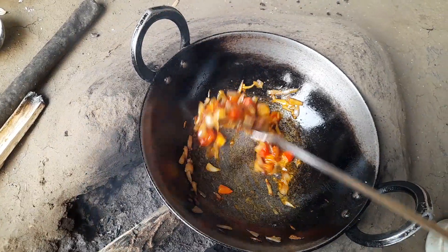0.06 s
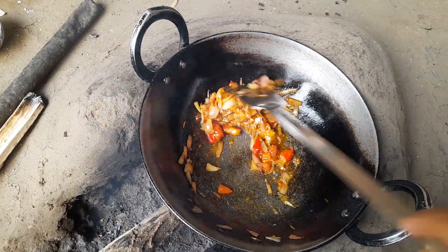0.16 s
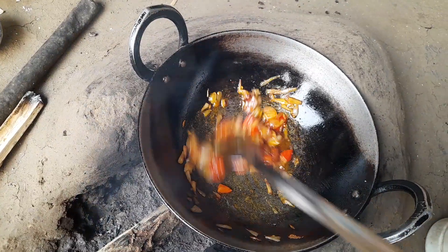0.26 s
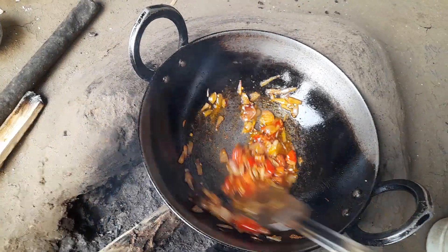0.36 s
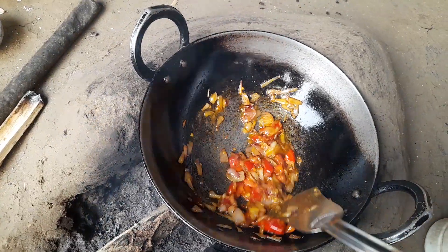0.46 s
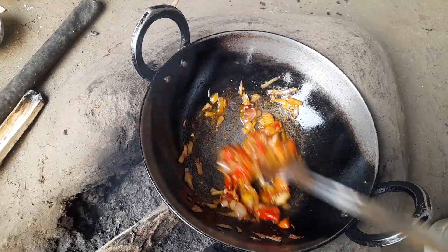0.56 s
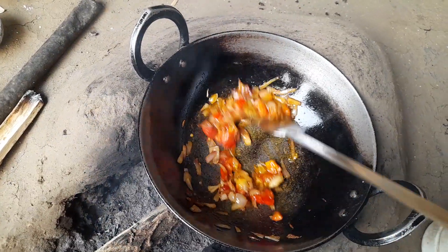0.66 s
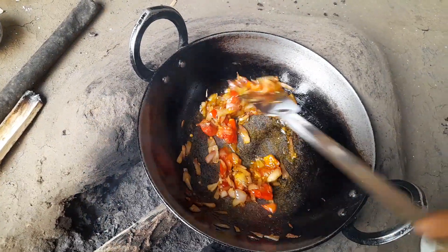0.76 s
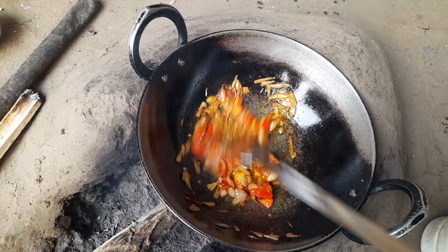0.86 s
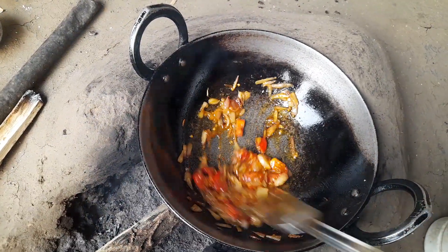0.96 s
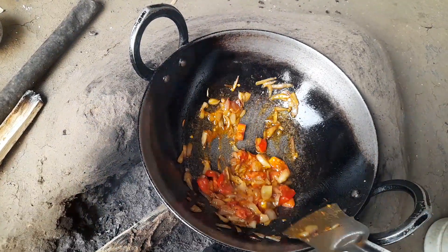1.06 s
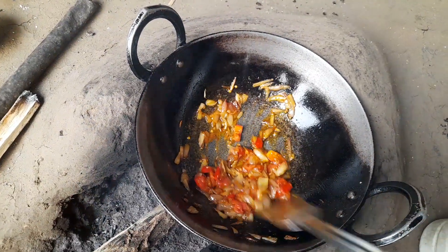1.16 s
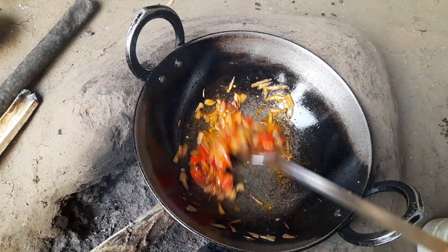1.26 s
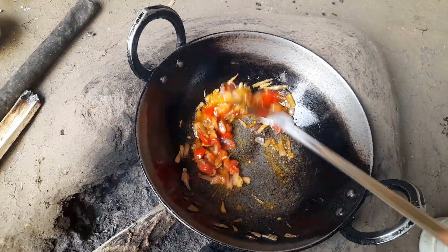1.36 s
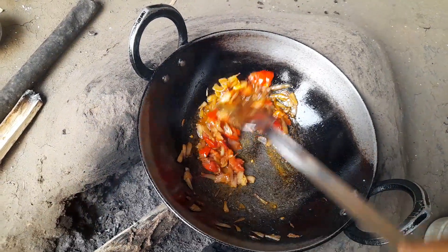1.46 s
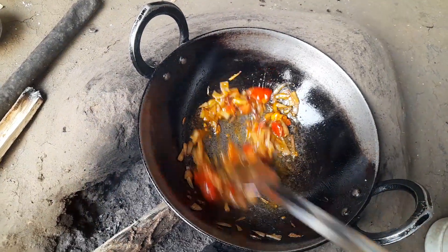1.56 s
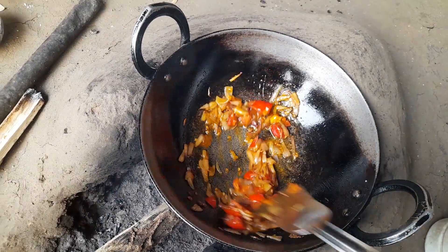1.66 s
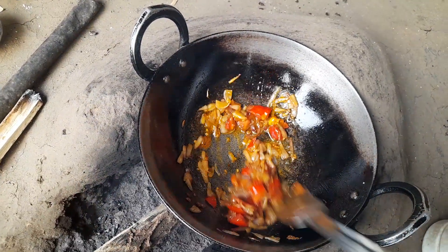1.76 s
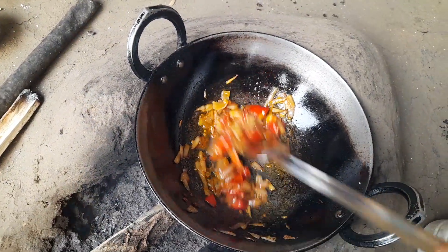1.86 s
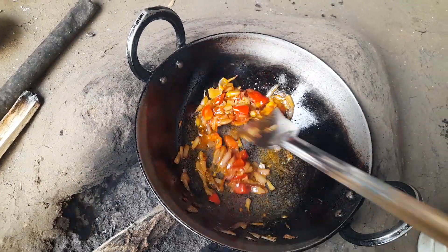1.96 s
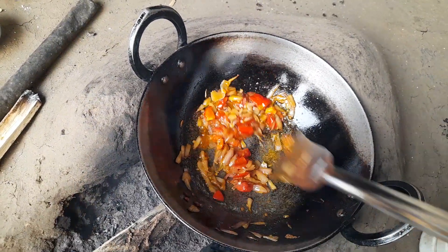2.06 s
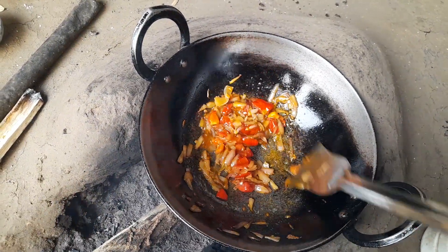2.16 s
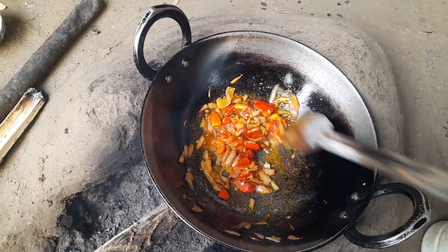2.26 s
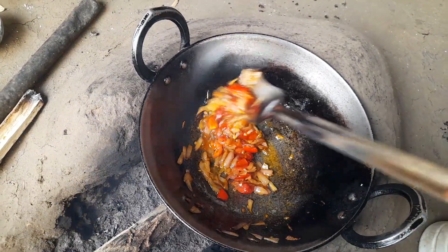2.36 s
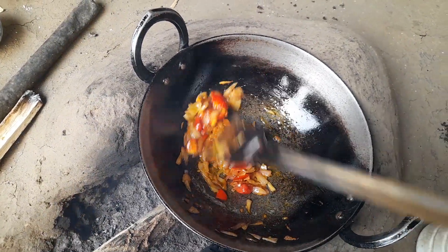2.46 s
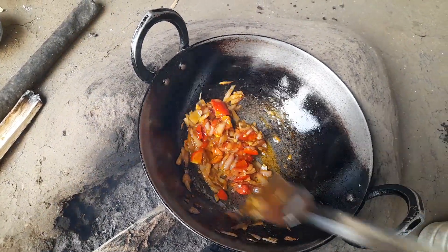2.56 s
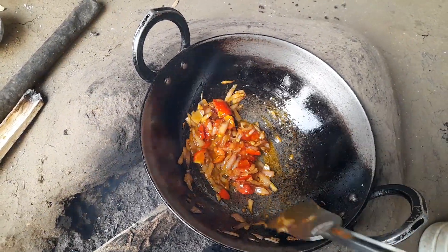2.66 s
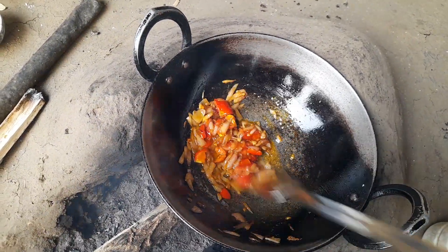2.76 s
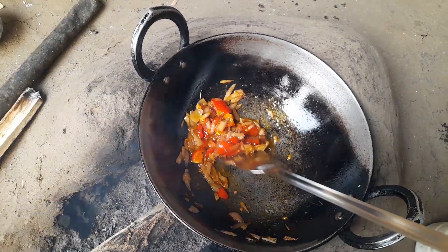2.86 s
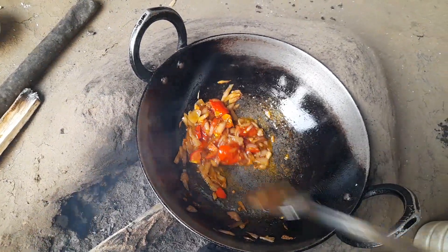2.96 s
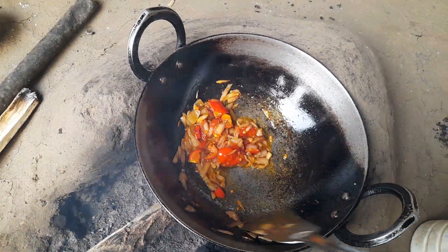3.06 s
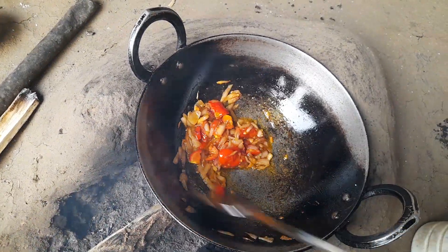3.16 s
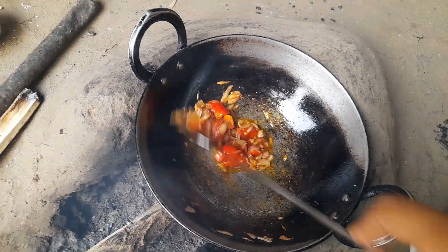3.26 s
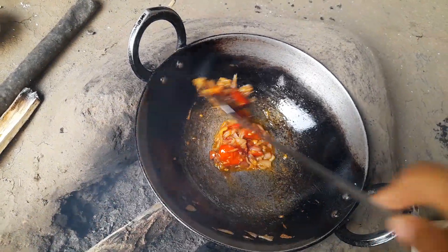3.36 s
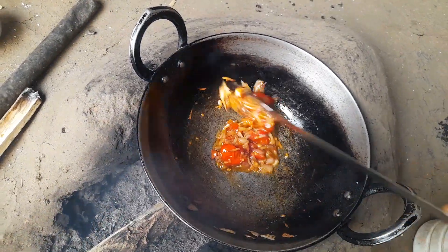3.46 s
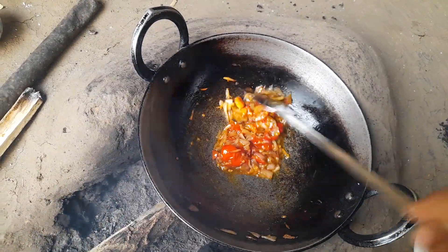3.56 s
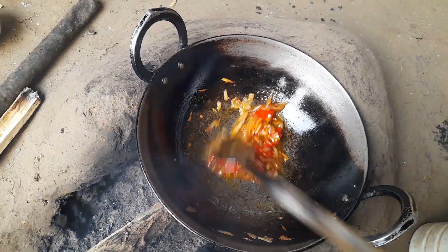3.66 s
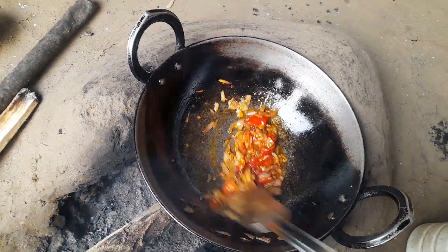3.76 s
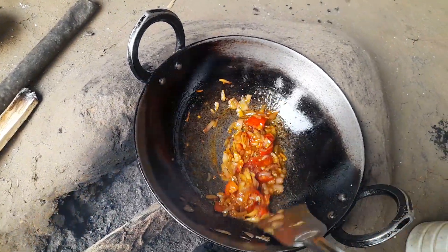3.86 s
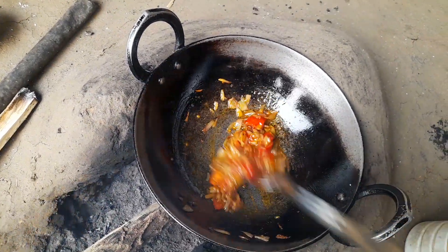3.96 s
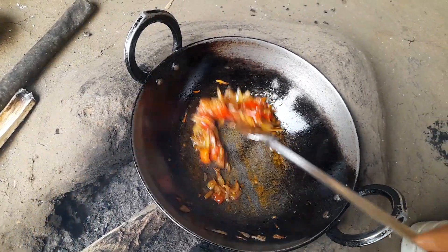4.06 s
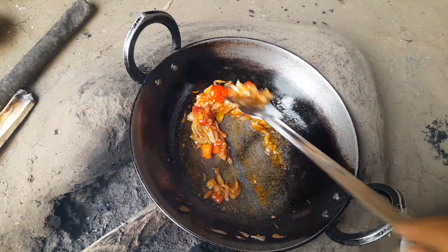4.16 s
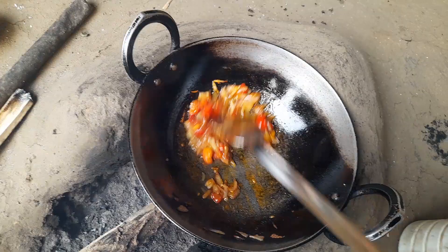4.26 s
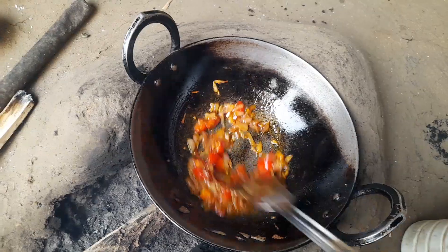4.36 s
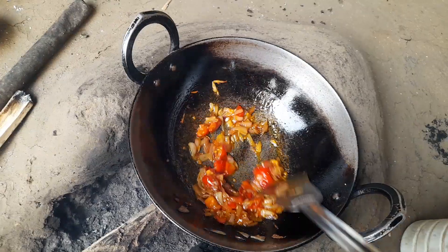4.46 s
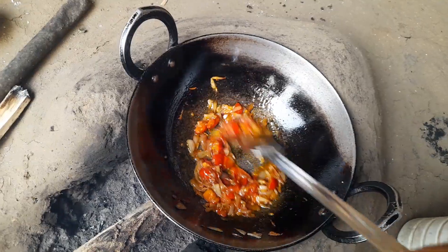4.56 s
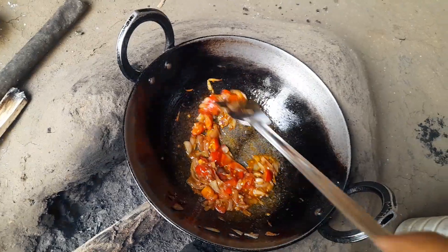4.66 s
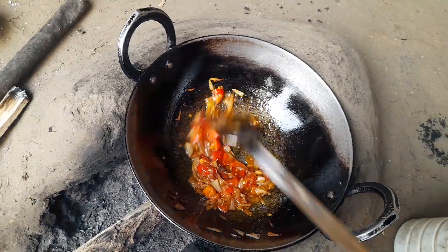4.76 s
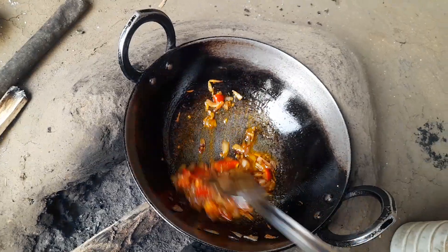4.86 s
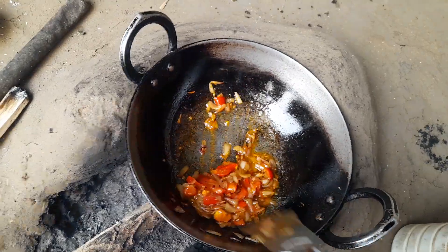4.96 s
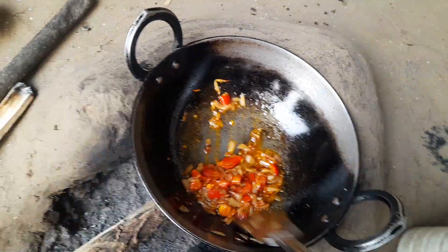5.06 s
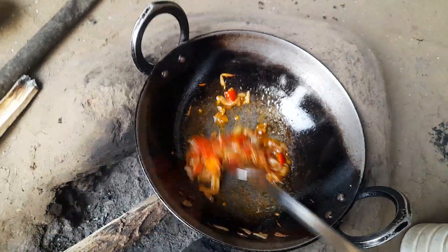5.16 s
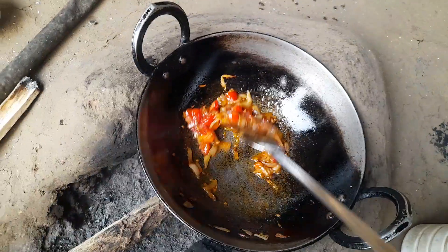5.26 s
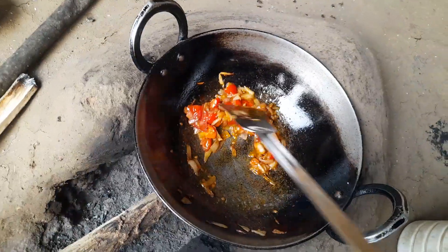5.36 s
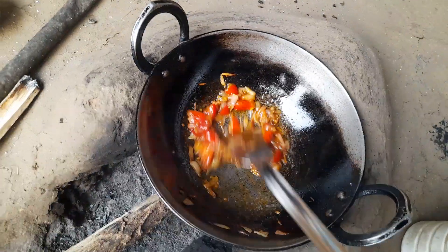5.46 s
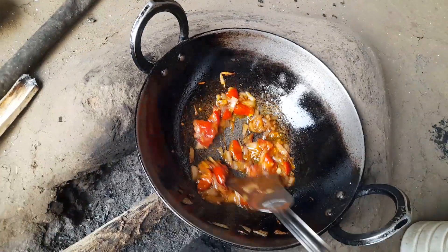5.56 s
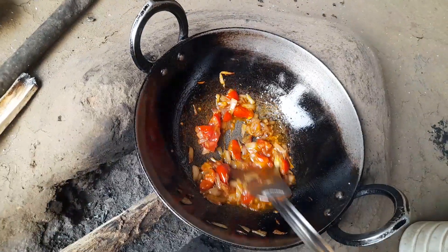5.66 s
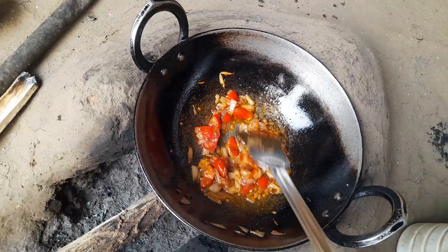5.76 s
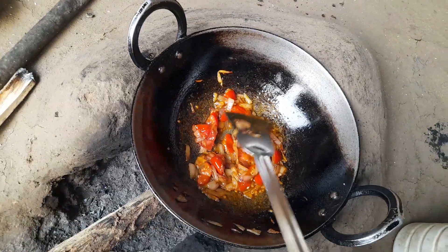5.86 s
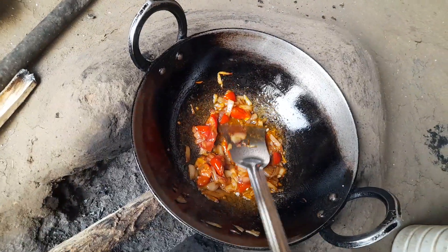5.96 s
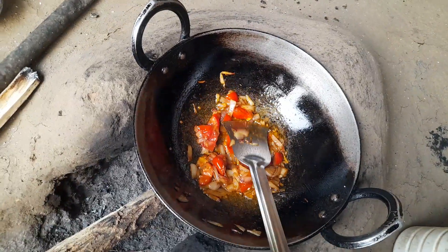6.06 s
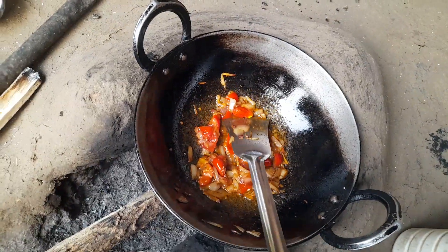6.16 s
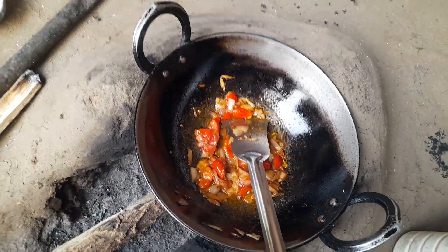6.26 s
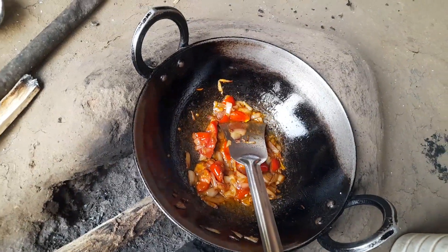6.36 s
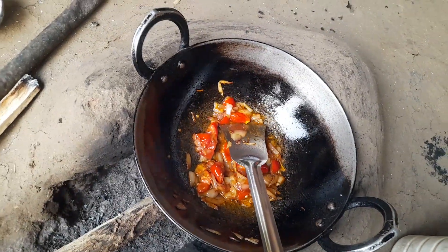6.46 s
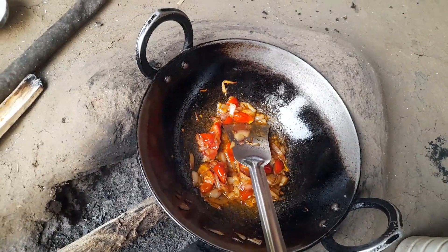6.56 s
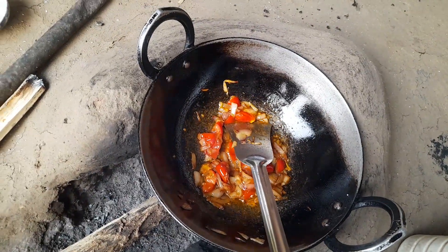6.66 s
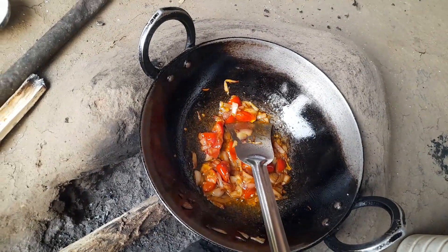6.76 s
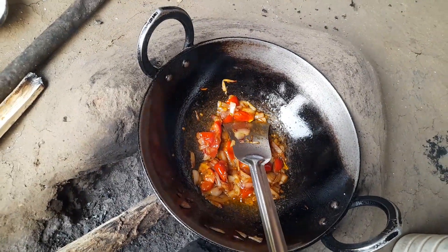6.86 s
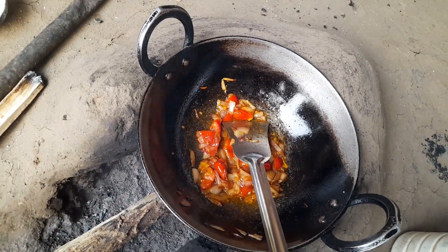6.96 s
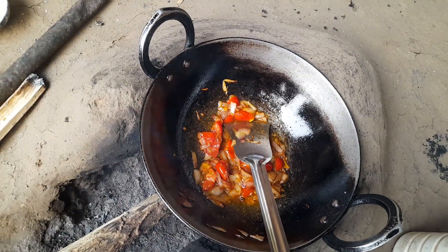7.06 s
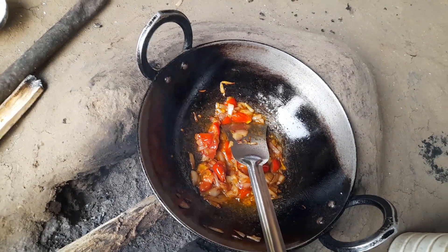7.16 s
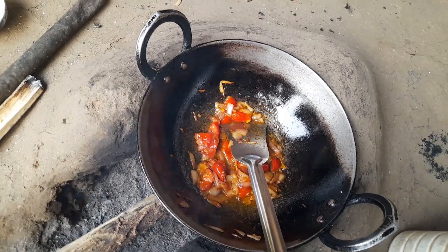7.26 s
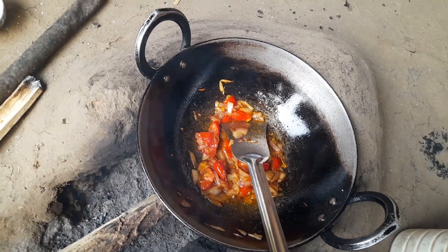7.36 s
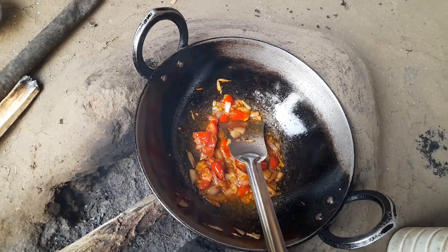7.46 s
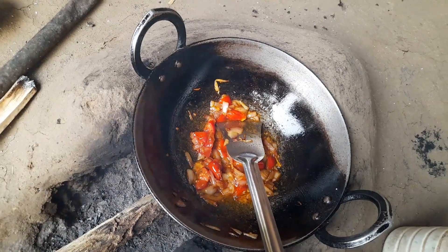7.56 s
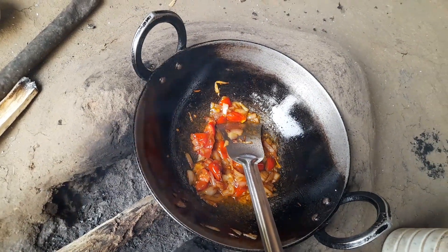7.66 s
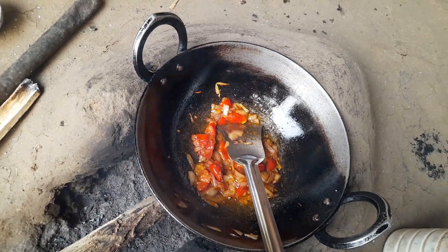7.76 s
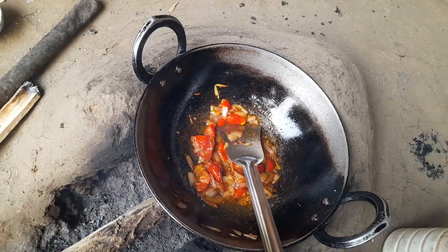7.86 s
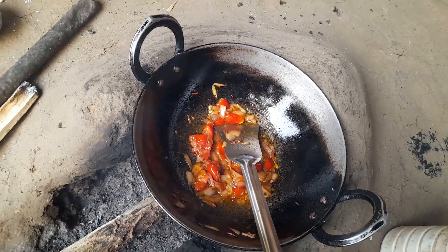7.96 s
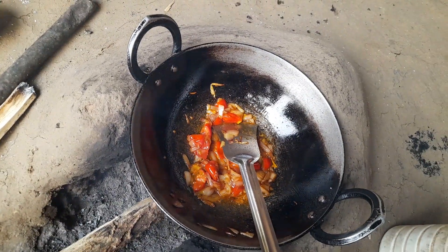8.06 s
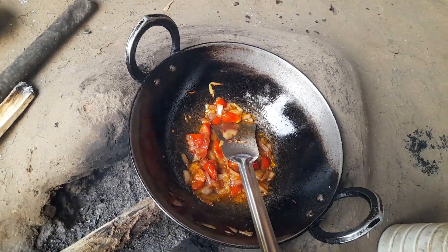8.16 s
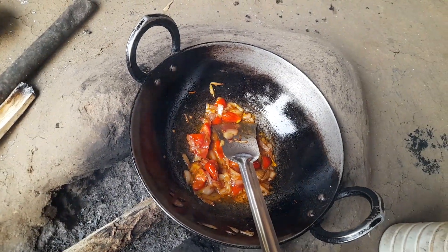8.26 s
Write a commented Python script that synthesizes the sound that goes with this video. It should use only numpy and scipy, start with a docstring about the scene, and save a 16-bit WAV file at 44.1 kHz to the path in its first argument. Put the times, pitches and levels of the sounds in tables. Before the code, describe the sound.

Vegetables sizzle briskly in oil as a metal spatula clanks and rasps across an iron pan, then rests, with faint goat bleats behind.

```python
"""A yard with an outdoor fire: chopped vegetables fry in an iron pan while a steel spatula knocks and scrapes.
The knocks and scraping grit set damped pan tones ringing; the blade also rasps, groans, clunks and rings free.
The sizzle is thousands of random clicks over the smooth roar of the fire.
Behind it a goat bleats softly in throbbing harmonics and the yard rumbles as low noise with a hum.
Two close microphone ports with different tone colours hear it all."""
import sys
import numpy as np
from scipy import signal
from scipy.fft import rfft, irfft
from scipy.io import wavfile

SR = 44100
rng = np.random.default_rng(int(sys.argv[2]) if len(sys.argv) > 2 else 0)


def unload_audio(sound):
    """Save the sound as a 16-bit wav file, at the path given as the first command line argument."""
    columns = np.transpose(np.atleast_2d(sound))
    # keep every value between -1 and 1, then stretch to whole-number steps
    steps = np.round(np.clip(columns, -1, 1) * 32767)
    wavfile.write(sys.argv[1], SR, steps.astype(np.int16))


N = 366912  # length in samples
FFT_SIZE = 2 ** 19

# Levels are relative: later steps may scale them. A "spectrum" lists f/Hz, level/dB.

# Spatula strokes: touch t/s, hardest push t/s, lift t/s, ring at push level/dB, ring at lift level/dB,
# thud at push level/dB, brightest pitch at touch f/Hz, at push f/Hz, at lift f/Hz
STROKES = [(.208, .237, .26, -40, -45, -50.5, 6500, 7140, 7060),
           (.58, .624, .64, -27, -40, -43, 5500, 4900, 5000),
           (1.138, 1.2, 1.28, -31, -37, -43, 6500, 6900, 4000),
           (1.76, 1.79, 1.905, -39, -37, -52, 4500, 7500, 4500),
           (2.224, 2.31, 2.365, -29, -32, -44, 6500, 6800, 6000),
           (2.707, 2.824, 2.865, -25, -32, -42, 4850, 4100, 4530),
           (3.06, 3.3, 3.36, -33, -36, -51, 7000, 6600, 4900),
           (3.976, 4.012, 4.042, -29, -30, -52, 5000, 4230, 5400),
           (4.511, 4.562, 4.598, -35, -39, -44, 6500, 6270, 5600),
           (5.057, 5.175, 5.197, -25, -29, -45, 6470, 5500, 6000),
           (8.1, 8.13, 8.2, -55, -57, -46, 6400, 6400, 6550)]
# Spatula blows: t/s, ring peak level/dB, then thud, knock, body and edge against the ring level/dB,
# pitch the struck spot favours f/Hz
BLOWS = [(0.0074, -25.5, -17.5, -21, -14, -23, 3060), (0.5661, -21.5, -17, -20, -12, -7, 3300),
         (0.6255, -28.5, -44, -8.5, -31, -24, 735), (0.804, -20.5, -6, -11, -19, -29, 750),
         (1.118, -23, -26, -30, -18, 2, 5300), (1.1297, -19, -17.5, -19.5, -23, -3, 2400),
         (1.221, -24, -15, -18, -14, -2, 1700), (1.2533, -24.5, -20, -29, -23, -16, 4330),
         (1.2785, -28, -32, -24, -20, -18, 3700), (1.895, -26.5, -35, -37, -25, -23, 5500),
         (2.1472, -12.5, -15, -25, -27, 2, 5960), (2.1708, -21.5, -13, -21, -23, -2, 6900),
         (2.2819, -12, -31, -22.5, -11.5, -0.5, 7600), (2.337, -27, -34, -8, -32, -23, 6900),
         (2.655, -24, -16, -15, -18, -5, 4600), (2.6755, -13, -25.5, -24, -20.5, -7.5, 2850),
         (2.7325, -29, -13, -17, -33, -6, 4900), (3.0512, -14, -35, -30, -24, -4, 2800),
         (3.266, -32, -16, -17, -27, -10, 5800), (3.602, -22.5, 2, 2.5, -12, -5, 1390),
         (3.704, -32.5, -16, -26.5, -32, -6, 760), (3.904, -18, -19, -31, -57, -4, 3550),
         (3.921, -16.5, -22.5, -25, -33, -10, 2850), (3.992, -22.5, -13, -20, -8.5, -28, 1760),
         (4.502, -21.5, -13, -36, -19, -6, 6180), (5.041, -9.5, -21, -16, -16.5, -2.5, 260),
         (5.0854, -21, -20, -23, -27, -7, 2850), (5.1073, -26, -15, -26, -24, 1, 2800),
         (5.5334, -38, -8.5, -14, -28, -1, 7040), (5.766, -47, -1, -18, -33, -22, 253),
         (6.0325, -11, -28, -20.5, -13, -14, 616), (8.135, -42, 5, -11, -8, -22, 329)]
# Pan and spatula tones, damped by oil and food: f/Hz, level/dB, time to fall 60 dB t/s
PAN_TONES = [(165, -12, 0.078), (260, 5.5, 0.076), (324, 2, 0.088), (430, 3, 0.029), (528, -8, 0.15),
             (637, 2.5, 0.084), (735, 13, 0.016), (927, 5, 0.045), (1193, -14, 0.11), (1410, -1, 0.039),
             (1620, -14, 0.046), (1806, -8, 0.12), (2274, -1, 0.017), (2400, 3.5, 0.018), (2644, -3, 0.04),
             (2877, -3.5, 0.045), (3780, -7.5, 0.026), (4110, -0.5, 0.009), (4440, -16, 0.041),
             (4900, -14, 0.042), (5655, -1.5, 0.012), (5930, -6, 0.033), (6340, -8, 0.06),
             (6560, 0.5, 0.017), (6900, -3.5, 0.026), (7180, -4.5, 0.023), (7750, -11, 0.011),
             (8610, -10.5, 0.053)]
# Where the thud, knock, body and ring bands lie: f/Hz
BANDS_HZ = 270, 800, 2000, 4500
# Bare rasp of the edge, spectrum: f/Hz, level/dB
RASP = [(1470, -35), (2500, -7), (4030, 1), (5180, -2.5), (7220, -4.5), (9000, 3.5), (11700, -38),
        (19800, -120)]
# Thin top of the rasp, spectrum: f/Hz, level/dB
HISS = [(8000, -19.5), (9500, -4), (13100, 5), (16000, -0.5)]
# The laid-down spatula rings freely: t/s, f/Hz, level/dB, time to fall 60 dB t/s
LET_GO = (6.033, 648, -38, .3)
# The blade judders and groans or squeals: start t/s, length t/s, first pitch f/Hz, last pitch f/Hz, level/dB
GROANS = [(1.165, .04, 2750, 3000, -39), (1.197, .09, 5300, 3700, -42), (2.225, .05, 2400, 2480, -46),
          (2.722, .055, 2600, 2500, -42), (3.085, .074, 515, 518, -47), (3.18, .052, 635, 644, -52),
          (3.32, .05, 4700, 4750, -42), (4.56, .03, 2500, 2450, -46), (5.104, .026, 2850, 2600, -38),
          (5.135, .045, 1300, 1800, -43), (5.165, .035, 4000, 3900, -35), (8.125, .085, 340, 312, -48)]
# Loudness over time: t/s, sizzle level/dB, yard rumble level/dB
FRYING = [(0, -34, -66), (1.1, -35.5, -69.5), (1.35, -33.5, -63.5), (2.1, -36.5, -65), (2.5, -37, -63.5),
          (2.95, -41, -63.5), (3.5, -45, -70.5), (4.2, -43, -66), (4.7, -41, -64.5), (5.4, -40.5, -60),
          (6.3, -44.5, -58.5), (6.949, -42, -54.5), (7.149, -44, -56.5), (7.55, -46, -53.5),
          (7.95, -44.5, -54), (8.32, -44.5, -50.5)]
# Sizzle of the oil, spectrum: f/Hz, level/dB
SIZZLE = [(240, -44), (400, -21.5), (528, -26.5), (579, -10.5), (777, -9), (935, -11.5), (1420, -7.5),
          (1790, -10.5), (2600, -6), (3640, -3.5), (3990, -4), (7990, -2.5), (10100, -13.5), (13700, -14.5),
          (16000, -9.5)]
# Soft roar of the flames, spectrum: f/Hz, level/dB
FIRE = [(260, -45), (450, -11.5), (618, -5.5), (964, -5.5), (2420, -8), (3000, -9), (3900, -19),
        (6600, -120)]
# Goat bleats: first throb t/s, throbs (count), first gap t/s, pitch f/Hz, sag at the ends f/Hz, level/dB,
# fall at the ends level/dB, bright harmonics at the start level/dB, when settled level/dB
BLEATS = [(0.015, 3, 0.087, 512, 0.11, -46.5, 3.4, 4, -34),
          (1.925, 10, 0.0825, 507, 46, -48.5, 2.1, -8, -10),
          (6.52, 11, .079, 516, 9.3, -46.5, 10.3, 3.5, -9)]
# The goat's bright harmonics, next to a third harmonic at 0 dB: multiple of the pitch, level/dB
HARMONICS = [(6, -8.5), (7, -9.5), (8, -6.5), (9, -6), (10, -7), (11, -23)]
# Yard rumble, spectrum: f/Hz, level/dB
RUMBLE = [(15, -47), (25, -17), (102, -5), (150, -1.5), (220, -13), (299, -7), (344, -11.5), (418, -24),
          (609, -15.5), (1000, -30), (1540, -120)]
# Gusts that swell the rumble: t/s, half-width t/s, rise level/dB
GUSTS = [(7.17, 0.088, 7), (7.55, 0.16, 4), (7.91, .07, 5), (8.17, .035, 2)]
# Soft low bumps on the microphone: t/s, level/dB, fading time t/s
BUMPS = [(0.153, -43, 0.0067), (3.065, -41, 0.023), (4.308, -52, 0.14)]
# How alike left and right are (values below 0 count as 0): f/Hz, likeness
LIKENESS = [(60, -0.13), (180, 0.86), (600, 0.95), (1650, 0.4), (4970, -0.02), (15000, -0.3)]
# Left port over right port, shared out between the two: f/Hz, level/dB
PORTS = [(40, -6), (100, 1), (450, -3.5), (1200, -3), (2000, 1), (3300, 1.5), (5500, 5), (8300, 10),
         (9200, 6), (10500, -2.5), (13000, -10), (16000, -8)]

# Strokes: ring as the edge meets the iron; share of the ring's swing in the thud
TOUCH_DB, THUD_FOLLOWS = -47, 0.29
LIFT_S, LIFT_DB = .014, 18  # the edge leaves the iron: time taken and level lost
# Blows: fading time of the rattle; below this pitch it shakes the heavy iron less
RATTLE_S, RATTLE_FROM_HZ = .0045, 310
SPOT_DB, SPOT_OCTAVES = 9.0, .1  # lift and width of the favoured pitch
SWING_UP_CYCLES = 1.1  # each tone starts at least this late
RASP_LIFT_DB, RASP_OCTAVES = 10.0, .28  # the rasp is loudest near the brightest pitch
RASP_PATCHY_DB = 3.0
PUSH_DB, PUSH_LOW_HZ, PUSH_HIGH_HZ = 32, 870, 1580  # dull clunk under each knock
# Groans: slips come unevenly in strength and pace; below the pitch the heavy iron evens them out
GROAN_ROUGH_DB, GROAN_WAVER, GROAN_EVEN_HZ = 6.0, .035, 1700
POPS_PER_S, POP_SPREAD_DB = 9000, 2
LOUD_POPS_PER_S, LOUD_POP_DB, LOUD_SPREAD_DB = 46, -13, 1
FIRE_DB = -56
THROB_S, BETWEEN_DB = .0115, -19  # half-width of a throb; soft voice between throbs
THROB_SLOWS_S = .0006  # throb number k comes later by this times k squared
ARCH_POWER, BRIGHT_FADE_S = 4.5, .3  # shape of a bleat's arch; fading time of its bright start
THROB_UNEVEN_DB, LOW_FADE_SHARE = 1.2, .35  # the two lowest bright harmonics change less
HUM_HZ, HUM_WIDTH_HZ, HUM_DB = 98, 5, -3


def spatula():
    """Grit under the edge and blows drive the same tones; each blow is a click and a short rattle."""
    grit = grains(9000, 2.2) * from_db(1.6 * drift(60))
    ring_db, thud_db, bright_hz = strokes()
    s, peak_db, blow_thud_db, knock_db, body_db, edge_db, spot_hz = np.transpose(BLOWS)
    at = np.round(s * SR).astype(int)
    crack = clatter(s, from_db(peak_db - 15.0), RATTLE_S)
    snap = clatter(s, from_db(peak_db + edge_db), 0.68 * RATTLE_S)
    bare = rms_one(colour(grit, RASP))
    out = crack * bare + rasp(bare, ring_db, bright_hz)
    out += (from_db(ring_db - 8.0) + snap) * rms_one(colour(grit, HISS))
    for hz, level_db, t60 in PAN_TONES:
        struck_db = peak_db + band_db(hz, blow_thud_db, knock_db, body_db, 0) + level_db
        struck_db = struck_db + 2 * rng.standard_normal(len(at))
        struck_db = struck_db + SPOT_DB * near(hz, spot_hz, SPOT_OCTAVES)
        strength = from_db(struck_db)
        rattle = clatter(s, strength * from_db(-30.0) * min(1, hz / RATTLE_FROM_HZ), RATTLE_S)
        scrape = from_db(scrape_db(hz, ring_db, thud_db, bright_hz) + level_db - 28.0)
        drive = grit * (scrape + rattle)
        # where the ports are less alike, the clicks reach them further out of step
        apart = 1 - np.clip(at_hz(LIKENESS, hz), 0, 1)
        lags = rng.random((len(at), 2)) * apart * .002 * SR + SWING_UP_CYCLES * SR / hz
        lags = lags.astype(int)
        for side in (0, 1):
            drive[side, at + lags[:, side]] += strength * from_db(-5.5)
        out += ring(drive, hz, t60)
    # the blade's sound is kept above 150 Hz
    return signal.sosfilt(signal.butter(4, 150, "high", fs=SR, output="sos"), out)


def strokes():
    """Each stroke touches, moves to its hardest push, then lifts; in between, the ring falls to -110 dB."""
    rows = []
    for touch, push, lift, push_db, lift_db, thud_db, touch_hz, push_hz, lift_hz in STROKES:
        s = [touch - LIFT_S / 2, touch, push, lift, lift + LIFT_S, lift + 1.5 * LIFT_S]
        ring_db = np.array([-110, min(TOUCH_DB, push_db), push_db, lift_db, lift_db - LIFT_DB, -110])
        hz = [touch_hz, touch_hz, push_hz, lift_hz, lift_hz, lift_hz]
        rows.append([s, ring_db, thud_db + THUD_FOLLOWS * (ring_db - push_db), hz])
    s, *columns = np.concatenate(rows, axis=1)
    return [np.interp(np.arange(N) / SR, s, column) for column in columns]


def clatter(s, gains, length):
    """The rattle after each blow starts at once and dies away exponentially."""
    out = np.zeros(N)
    for start, gain in zip(np.round(s * SR).astype(int), gains):
        out[start:start + 4000] += gain * np.exp(-np.arange(4000) / (length * SR))
    return out


def scrape_db(hz, ring_db, thud_db, bright_hz):
    """The hollow between blade and bowl lifts the pan tones near bright_hz."""
    lift_db = 9 * near(hz, bright_hz, .2) + 3 * drift(20)
    body_db = (ring_db + thud_db) / 2 - 4.5
    return band_db(hz, thud_db - 11.5, thud_db - 13.0, body_db, ring_db) + lift_db


def band_db(hz, *levels_db):
    """A tone's level at one pitch is blended from the thud, knock, body and ring levels."""
    shares = [np.interp(np.log(hz), np.log(BANDS_HZ), row) for row in np.eye(4)]
    return sum(share * db for share, db in zip(shares, levels_db))


def rasp(noise, ring_db, bright_hz):
    """The edge scrapes in narrow bands, each flickering alone and lifted as the bright pitch passes."""
    out, edges = 0, np.geomspace(1500, 12000, num=13)
    for low, high in zip(edges, edges[1:]):
        band = signal.sosfilt(signal.butter(2, [low, high], "band", fs=SR, output="sos"), noise)
        lift_db = RASP_LIFT_DB * near(np.sqrt(low * high), bright_hz, RASP_OCTAVES)
        out = out + band * from_db(ring_db + 0.5 + lift_db + RASP_PATCHY_DB * drift(48))
    return out


def clunk():
    """Each blow shoves the iron: a click and a short noise puff in one broad band."""
    s, peak_db, _, knock_db, *_ = np.transpose(BLOWS)
    gains = from_db(peak_db + knock_db + PUSH_DB)
    shove = clatter(s, gains * from_db(-31.0), 2.0 * RATTLE_S) * rng.standard_normal(N)
    shove[np.round(s * SR).astype(int)] -= gains
    band = signal.butter(2, [PUSH_LOW_HZ, PUSH_HIGH_HZ], "band", fs=SR, output="sos")
    return signal.sosfilt(band, shove)


def free_ring():
    """The spatula, laid down and let go, rings as one fading tone."""
    s, hz, level_db, t60 = LET_GO
    return ring(from_db(level_db) * (np.arange(N) == int(s * SR)), hz, t60)


def groan():
    """Stick-slip: three stretches of the edge slip at their own pace, in rough tones that swell and die."""
    out = np.zeros(N)
    for _ in range(3):
        rough_db, waver = GROAN_ROUGH_DB * drift(120), GROAN_WAVER * drift(158)
        for s, length, first_hz, last_hz, level_db in GROANS:
            span = slice(int(s * SR), int((s + length) * SR))
            uneven = min(1, first_hz / GROAN_EVEN_HZ)
            u = np.linspace(0, 1, span.stop - span.start)
            hz = (first_hz + (last_hz - first_hz) * u) * (1 + uneven * waver[span])
            phase = 2 * np.pi * (uneven * rng.random() + np.cumsum(hz) / SR)
            swell = np.sqrt(2 * np.sin(np.pi * np.sqrt(u)))
            out[span] += from_db(level_db + uneven * rough_db[span] - 7.0) * swell * np.sin(phase)
    return out


def sizzle(level_db):
    """Steam pockets burst in the oil as random clicks, with a sparser layer of extra pops."""
    pops = grains(POPS_PER_S * from_db(1.5 * drift(60)), POP_SPREAD_DB)
    pops = pops + from_db(LOUD_POP_DB) * grains(LOUD_POPS_PER_S, LOUD_SPREAD_DB)
    unsteady_db = .6 * drift(8)
    return from_db(level_db + unsteady_db) * rms_one(colour(pops, SIZZLE))


def fire():
    """The flames' even roar is a dense shower of clicks with a soft tone colour."""
    return from_db(FIRE_DB) * rms_one(colour(grains(20000, 1.0), FIRE))


def goat():
    """The throat lifts the third harmonic and a bright group above; pitch rises within each throb."""
    t = np.arange(N) / SR
    s, hz, level_db, bright_db = throbs()
    nearest = np.argmin(abs(t[::32, None] - s), axis=1).repeat(32)[:N]
    since = t - s[nearest]
    throb = from_db(level_db[nearest]) * (np.exp(-.5 * (since / THROB_S) ** 2) + from_db(BETWEEN_DB))
    throb *= abs(since) < 4 * THROB_S  # silent away from the bleats
    pitch = np.interp(t, s, hz) * (1 + 0.713 * np.clip(since, -.04, .04) + 0.00907 * drift(120.0))
    phase = 2 * np.pi * np.cumsum(pitch) / SR
    voice = np.sin(3 * phase)
    for multiple, db in HARMONICS:
        share = LOW_FADE_SHARE if multiple < 8 else 1
        loudness = from_db(db + 4.2 * drift(27) + bright_db[nearest] * share)
        voice = voice + loudness * np.sin(multiple * phase)
    return np.sqrt(2) * throb * voice


def throbs():
    """Each bleat arches in pitch and level and its throbs slow a little: time, pitch, level, brightness."""
    rows = []
    for first, count, gap, hz, sag_hz, level_db, fall_db, start_db, settled_db in BLEATS:
        k = np.arange(round(count))
        since = gap * k + THROB_SLOWS_S * k ** 2
        edge = abs(2 * since / since[-1] - 1) ** ARCH_POWER  # 1 at both ends, 0 in the middle
        bright_db = settled_db + (start_db - settled_db) * np.exp(-(since / BRIGHT_FADE_S) ** 6)
        throb_db = level_db - fall_db * edge + THROB_UNEVEN_DB * rng.standard_normal(len(k))
        rows.append([first + since, hz - sag_hz * edge, throb_db, bright_db])
    return np.concatenate(rows, axis=1)


def yard(level_db):
    """Lumpy low noise with a wavering hum, partly its own in each port, swells in gusts."""
    white = rng.standard_normal(N) + 0.72 * rng.standard_normal((2, N))
    hum = ring(white[0], HUM_HZ, np.log(1000) / (np.pi * HUM_WIDTH_HZ))  # the hum is the same in both
    noise = rms_one(colour(white, RUMBLE)) * from_db(1.7 * drift(4.4))
    t = np.arange(N) / SR
    gust_db = sum(db * np.exp(-.5 * ((t - s) / width) ** 2) for s, width, db in GUSTS)
    return from_db(level_db + gust_db) * (noise + from_db(HUM_DB) * rms_one(hum))


def bumps():
    """Dull pushes of air are low noise that starts at once and fades."""
    t, push = np.arange(N) / SR, np.zeros(N)
    for s, level_db, length in BUMPS:
        push += from_db(level_db) * (t > s) * np.exp(-abs(t - s) / length)
    dull = signal.butter(2, [30, 160], "band", fs=SR, output="sos")
    return push * rms_one(signal.sosfilt(dull, rng.standard_normal(N)))


def grains(per_s, spread_db, count=6):
    """Random clicks from several spots reach each port by short echoes that scatter phase, not colour."""
    sizes = from_db(spread_db * np.minimum(rng.exponential(1, N), 6)) * rng.choice([-1, 1], N)
    clicks = sizes * (rng.random(N) < per_s / SR)
    spot = rng.integers(0, count, N)
    alike = np.clip(at_hz(LIKENESS, np.linspace(1, SR / 2, FFT_SIZE // 2 + 1)), 0, 1)
    out = 0
    for k in range(count):
        echoes = rng.standard_normal((2, 88)) * np.exp(-np.arange(88) / (0.00073 * SR))
        echoes = rfft(echoes, FFT_SIZE)
        path = np.sqrt(alike) + np.sqrt(1 - alike) * echoes / abs(echoes)
        out = out + rfft(clicks * (spot == k), FFT_SIZE) * path / (abs(path) + 1e-9)
    return rms_one(irfft(out)[:, :N])


def ring(x, hz, t60):
    """A single click sets a sine of height about 1 ringing, which falls 60 dB in t60 seconds."""
    r, w = from_db(-60 / (t60 * SR)), 2 * np.pi * hz / SR
    return signal.lfilter([0, np.sin(w)], [1, -2 * r * np.cos(w), r * r], x + 1e-18)


def colour(x, points, share=1):
    """Filter with a given spectrum, responding as early as it can (minimum phase); share scales the dB."""
    hz = np.linspace(1, SR / 2, FFT_SIZE // 2 + 1)
    log_gain = share * np.log(from_db(at_hz(points, hz)))
    # fold the cepstrum forward so nothing sounds before its cause
    cepstrum = irfft(log_gain)
    cepstrum[1:FFT_SIZE // 2] *= 2
    cepstrum[FFT_SIZE // 2 + 1:] = 0
    return irfft(rfft(x, FFT_SIZE) * np.exp(rfft(cepstrum)))[..., :N]


def drift(rate):
    """Slow random wandering with spread 1; a higher rate in Hz wanders faster."""
    r = np.exp(-80 * np.pi * rate / SR)  # made at one value per 40 samples
    slow = signal.lfilter([1], [1, -2 * r, r * r], rng.standard_normal(N // 40 + 2002))[2000:]
    return np.interp(np.arange(N) / 40, np.arange(len(slow)), rms_one(slow))


def near(hz, centre_hz, octaves):
    """1 at the centre pitch, falling away as a bell over octaves."""
    return np.exp(-.5 * (np.log2(hz / centre_hz) / octaves) ** 2)


def at_hz(points, hz):
    """Read a table of pitch and value, in even steps of log pitch."""
    return np.interp(np.log(hz), np.log(np.array(points)[:, 0]), np.array(points)[:, 1])


def from_db(db):
    """Turn decibels into a plain gain."""
    return 10 ** (np.asarray(db) / 20)


def rms_one(x):
    """Scale to an average (RMS) strength of 1."""
    return x / np.sqrt(np.mean(x ** 2) + 1e-20)


def scene():
    """Add up the spatula, the frying, the fire, the goat and the yard."""
    s, sizzle_db, rumble_db = np.transpose(FRYING)
    t = np.arange(N) / SR
    blade = spatula() + clunk() + free_ring() + groan()
    cooking = sizzle(np.interp(t, s, sizzle_db)) + fire()
    background = goat() + yard(np.interp(t, s, rumble_db)) + bumps()
    return blade + cooking + background


def record(dry):
    """Each port has its own colour; the hardest peaks are rounded and the top is cut."""
    ports = np.array([colour(dry[0], PORTS, share=0.63), colour(dry[1], PORTS, share=-0.43)])
    rounded = .92 * np.tanh(ports / .92)
    # 60 dB down from 16300 Hz upward
    return signal.sosfilt(signal.cheby2(12, 60, 16300, fs=SR, output="sos"), rounded)


dry = scene()
out = record(dry)
unload_audio(out)
```